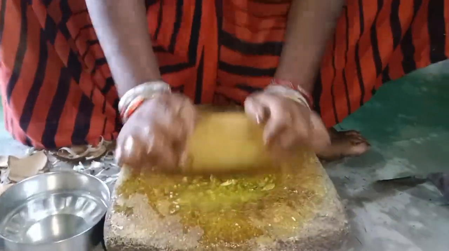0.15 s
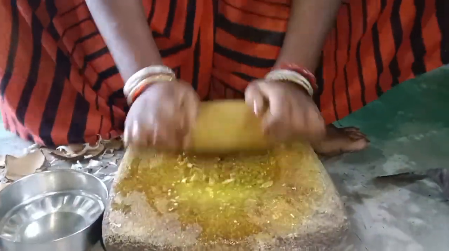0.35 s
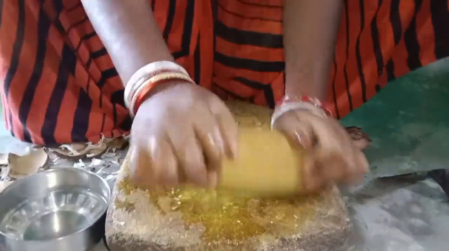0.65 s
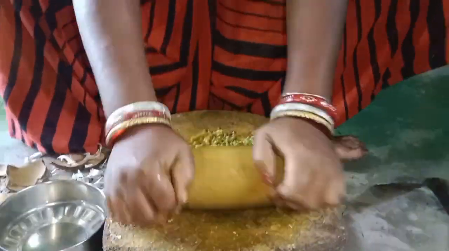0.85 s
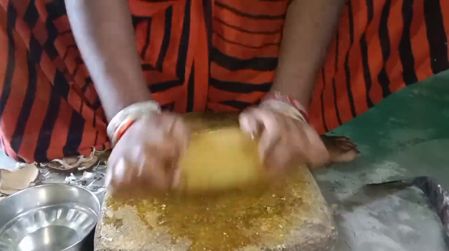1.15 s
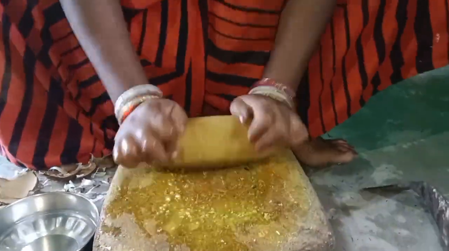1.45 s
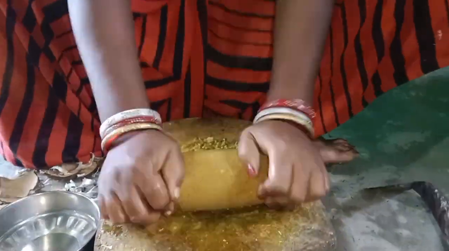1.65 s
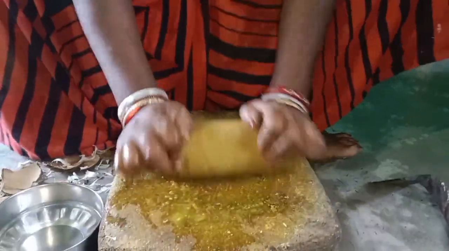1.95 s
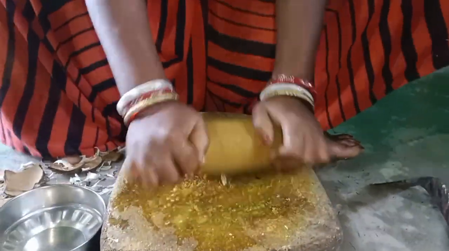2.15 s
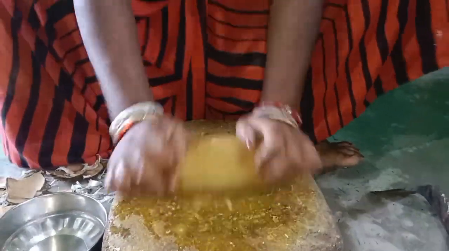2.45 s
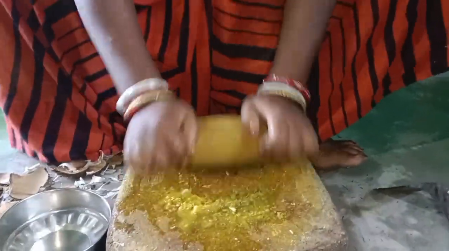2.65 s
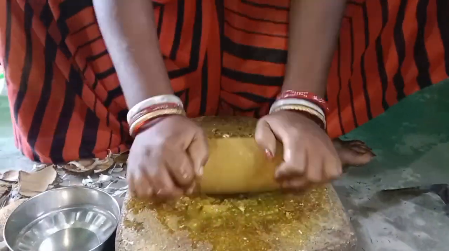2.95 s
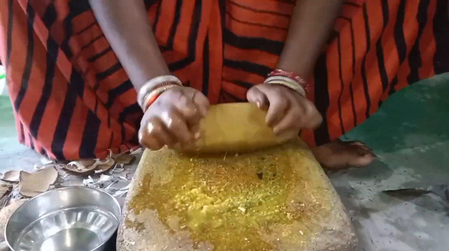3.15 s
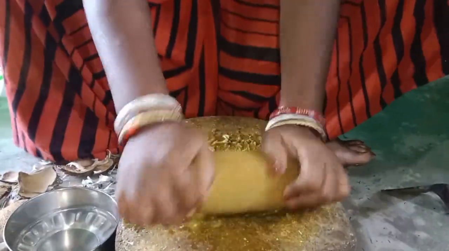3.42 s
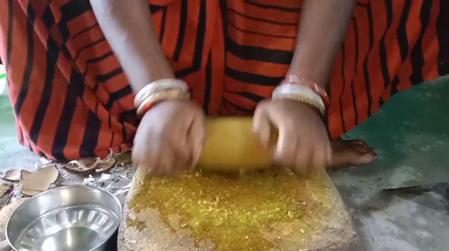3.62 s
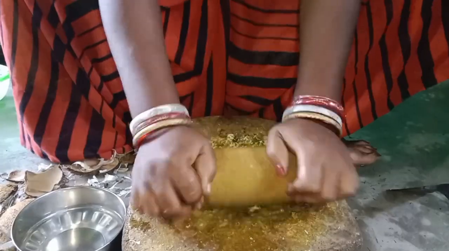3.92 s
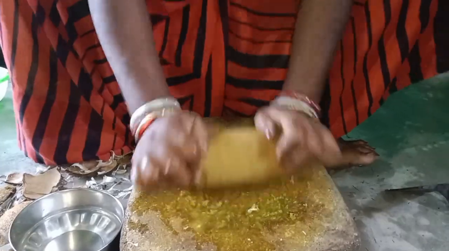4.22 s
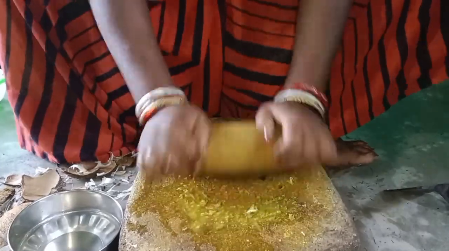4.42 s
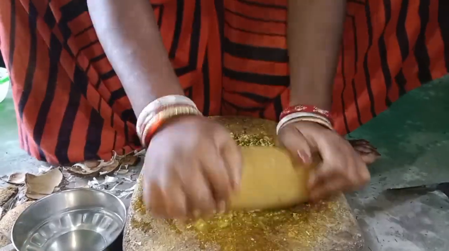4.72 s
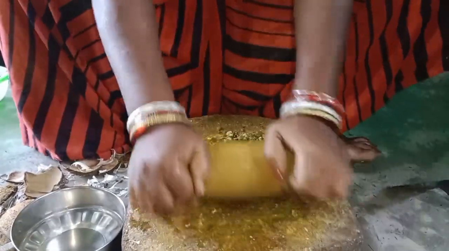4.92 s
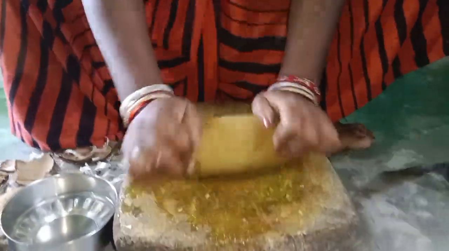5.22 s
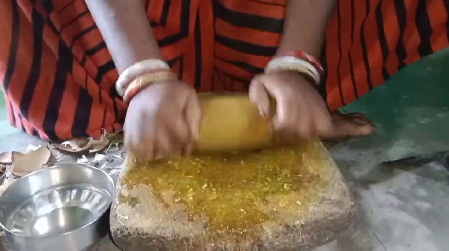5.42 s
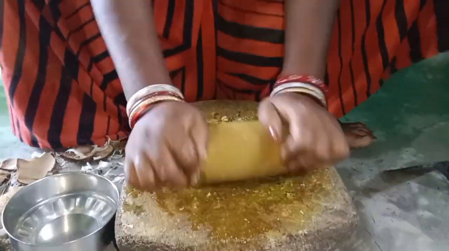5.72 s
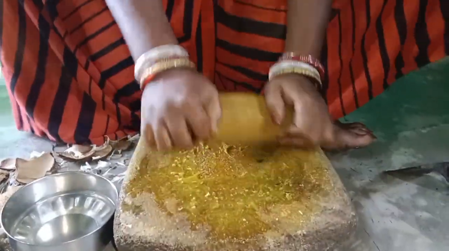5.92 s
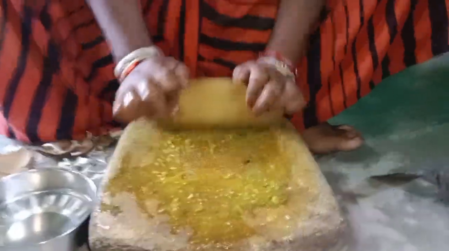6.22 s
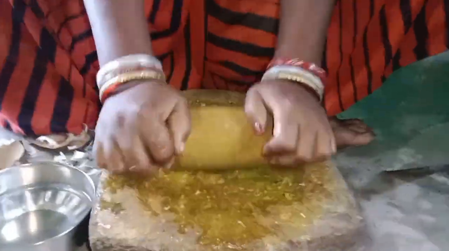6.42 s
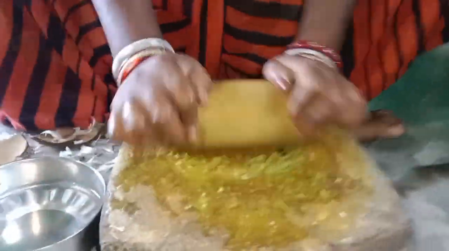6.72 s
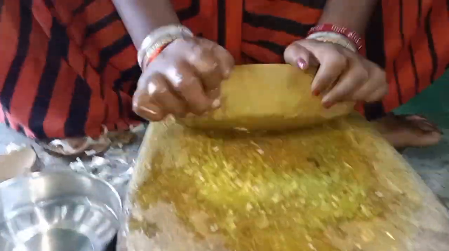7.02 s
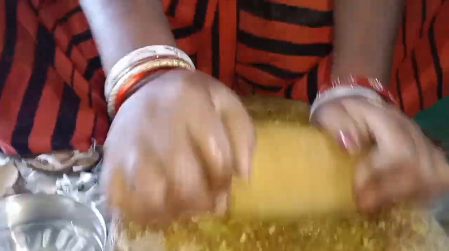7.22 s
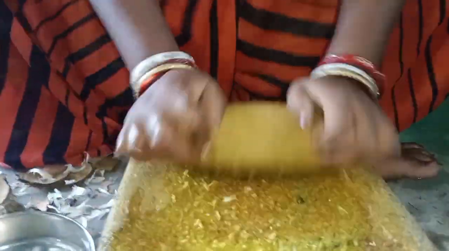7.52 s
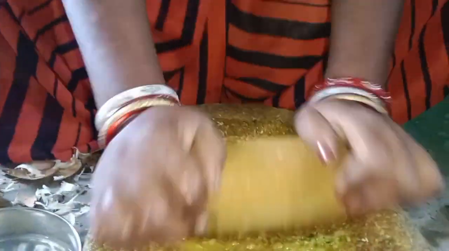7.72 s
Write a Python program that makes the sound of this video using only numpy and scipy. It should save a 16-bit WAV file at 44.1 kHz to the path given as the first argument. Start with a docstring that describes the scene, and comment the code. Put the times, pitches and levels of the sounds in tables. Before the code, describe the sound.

A heavy stone roller is pushed to and fro over a flat stone slab, grinding moist spices. Gritty mid-pitched rasps come about five a second, alternately strong and weak, with short dry knocks when the stones catch. Bangles on the wrists clack brightly at many turns, and paste hisses softly. Close microphone in a small hard room, faint steady background, a slight puff of air midway.

```python
"""Stone roller on a stone slab

A stone roller rasps to and fro over a slab: rough noise rings both stones through their resonances.
Sharp thuds are grit catching; shaped noise makes the treble hiss and the rumbling air.
Bangles clack as short noise bursts ring decaying modes. Small walls answer, air puffs on the microphone,
and a faint steady home lies behind."""
import sys
import numpy as np
from scipy import signal
from scipy.fft import rfft, irfft, next_fast_len
from scipy.io import wavfile
from scipy.ndimage import uniform_filter1d, map_coordinates

SR = 44100
rng = np.random.default_rng(int(sys.argv[2]) if len(sys.argv) > 2 else 0)


def store_wav(level_fs):
    """Save 16-bit WAV to argv[1]."""
    pcm = np.round(np.clip(np.atleast_2d(level_fs), -1, 1) * 32767)
    wavfile.write(sys.argv[1], SR, pcm.T.astype(np.int16))


N = 347067
TIME = np.arange(N) / SR
STEPS = np.arange(0, N / SR, .001)  # control steps of a millisecond

# Strokes of the roller: [bite t/s, swell/s, hold/s, bite level/dB, peak level/dB, mid-stroke centre f/Hz,
# then base levels over the rasp: slab bass/dB, roller low ring/dB, roller high ring/dB]
STROKES = [(0.0, 0.0071, 0.018, -45, -47.5, 729.4, -9, -26, -19),
           (0.113, 0.016, 0.01485, -51, -50, 833.8, -4, -7, -16),
           (0.334, 0.00372, 0.003485, -27, -29, 760, -8.5, -21, -26.5),
           (0.473, 0.037, 0.044, -58, -56.5, 768.9, -6, -42, -40),
           (0.705, 0.12, 0.029, -19, -13, 886, -20, -20, -16.5),
           (0.954, 0.14, 0.0073, -22.5, -15.5, 666, -7, -37.5, -22.5),
           (1.194, 0.023, 0.0627, -49.5, -47.5, 675.2, 3.5, -20.5, -20),
           (1.269, 0.064004, 0.0379, -46.5, -21.5, 766.3, -13.5, -32, -22),
           (1.49, 0.012, 0.0049, -21.5, -20.5, 860, -8.5, -32.5, -23.5),
           (1.729, .004, 0.078, -28, -28.5, 709.9, -10.5, -24.5, -23.5),
           (1.884, 0.039, 0.00302, -48.5, -32.5, 717.3, 0, -20, -20.5),
           (2.116, 0.0072, 0.015, -27, -23.5, 825.1, -19, -20.5, -33),
           (2.193, 0.01226, 0.069, -50, -44, 690.5, 1, -26.5, -28),
           (2.315, 0.094, 0.00341, -27, -16.5, 893, -14.5, -10.5, -26.5),
           (2.598, 0.018, 0.052, -39, -23, 730, -10, -21, -23.5),
           (2.78, 0.01559, 0.01168, -26, -23.5, 840, -10.5, -12, -17.5),
           (2.996, 0.027, 0.0044, -22.5, -19.5, 760, -26.5, -23, -29.5),
           (3.178, 0.04614, 0.073, -50.5, -49, 728.2, -4.5, -10, -12),
           (3.419, 0.068, 0.04842, -23.5, -11.5, 934, -25, -15.5, -22),
           (3.667, 0.00647, 0.16, -26.5, -28.5, 603, -0.5, -30, -29),
           (3.942, 0.076, 0.00369, -30.5, -19, 690, -16.5, -29, -25.5),
           (4.145, 0.016994, 0.03994, -26, -25.5, 800, -7, -15, -21),
           (4.353, 0.025, 0.04839, -23, -17.5, 834, -14.5, -21.5, -27.5),
           (4.55, 0.029, 0.04544, -56, -53, 788, -6.5, -11, -20.5),
           (4.793, 0.052, 0.061, -19.5, -14.5, 906, -18.5, -14.5, -21.5),
           (5.031, 0.091, 0.087, -26.5, -16, 630, -8.5, -35.5, -25),
           (5.308, 0.067, 0.084, -47, -16.5, 820, -17.5, -22, -27.5),
           (5.579, 0.012, 0.054, -27, -24.5, 790, -9.5, -17, -22),
           (5.785, 0.028, 0.06889, -29, -23.5, 787.4, -10, -19, -26.5),
           (5.994, 0.086, 0.062, -25, -20, 785.8, -16.5, -12.5, -16),
           (6.185, 0.06, 0.045, -40, -38.5, 840, -5.5, -13, -19),
           (6.372, 0.082, 0.052, -23.5, -16, 768.9, -13, -21, -25),
           (6.6, 0.065, 0.07799, -49, -35, 835, -11.5, -21.5, -26.5),
           (6.859, 0.00747, 0.096, -20.5, -16.5, 860, -16.5, -25.5, -30.5),
           (7.047, 0.062, 0.038, -50, -26, 834.6, -10, -32, -38),
           (7.287, 0.06011, 0.076, -28, -14.5, 956, -27, -19, -21),
           (7.51, 0.0068, 0.082, -33, -26, 686, -4, -27, -33),
           (7.62, 0.022, 0.11, -47, -43, 764, -8, -18, -37),
           (7.837, 0.038, 0.047, -20.5, -13.5, 910, -31, -26.5, -24)]
# Drift through a stroke of bass, low ring, high ring: [rate/(dB/s), extra rate per octave of brightness/(dB/s)]
STROKE_DRIFT = [(64.5, 101.5), (-10, -500), (68, 248)]
# Slab resonances: [f/Hz, width/Hz, level/dB]
SLAB_MODES = [(541, 84, -4), (652, 48.775, 2), (790.67, 41.7, -3), (847.4, 31.6, -1.5), (934.3, 45, 3),
              (1034, 33, -1.5), (1121.4, 31.4, -6.5), (1196, 66, -4), (1383, 198, -5), (1663, 197, -4),
              (1771, 155, -2.5), (2125, 340, -15.5)]
# Deep slab resonances: [f/Hz, width/Hz, level/dB]
SLAB_BASS_MODES = [(224, 50, -7), (209, 33.7, -7), (324.6, 32.6, -2), (386.6, 32.25, 2.5), (457, 83, -4)]
# Low ring of the roller: [f/Hz, width/Hz, level/dB]
ROLLER_LOW_MODES = [(2553, 28, 10), (2610, 90, -7), (2481.5, 200, -13)]
# Lower roller modes that swell late in the long pushes: [f/Hz, width/Hz, level/dB]
ROLLER_LATE_MODES = [(2345, 50, 0), (2300, 250, -12)]
# Those late swells: [peak t/s, Gaussian half length/s, level/dB]
LATE_SWELLS = [(0.831, 0.06212, -35.5), (1.526, 0.027, -48), (2.434, 0.03032, -36), (3.547, 0.043, -39),
               (4.89, 0.042, -41), (6.198, 0.035, -36.5), (6.45, 0.075, -52), (7.405, 0.03386, -35)]
# High ring of the roller: [f/Hz, width/Hz, level/dB]
ROLLER_HIGH_MODES = [(3830, 55, -7), (4940, 160, -16), (5290, 140, -9.5), (5936, 124, -3.5), (5980, 80, 3),
                     (6164, 175, -7), (8160, 190, -21.5), (11800, 400, -25)]
# Tilt of each high roller mode while a stroke rises, reversed while it falls: [level/dB]
ROLLER_RISING_TILT = [-3, 6, -3.5, -2, -0.5, -3, -0.5, -0.5]
# Hard catches of stone on stone: [t/s, impulse level/dB]
KNOCKS = [(0.3332, -20), (0.8439, -12), (0.8637, -7.5), (0.951, -12.5), (0.9802, -1), (1.0264, -6),
          (1.0651, -6), (1.4982, -7), (1.9383, -23), (2.1485, -18), (2.3335, -14.5), (2.4066, -16),
          (2.42, -16), (3.0263, -14.5), (3.4424, -14.5), (3.4783, -3), (3.6612, -15), (3.7353, -20),
          (4.0054, -10.5), (4.1489, -18), (4.1723, -13), (4.3518, -20), (4.4284, -18), (4.8149, -12.5),
          (5.0361, 0), (5.0492, -9.5), (5.0741, -12.5), (5.0953, -9), (5.119, -7.5), (5.1721, -12),
          (5.4019, -20), (5.4283, -8.5), (5.4508, -10), (5.5905, -15.5), (5.6095, -12.5), (5.821, -18),
          (6.0526, -14), (6.4357, -6), (6.4558, -6.5), (7.0888, -17), (7.1505, -26), (7.5096, -10.5),
          (7.5495, -14)]
# Swells of treble hiss: smeared paste, and the hissing tails of bangle clacks; levels are before the
# hiss trim, times are clipped to 4-300 ms: [peak t/s, level/dB, 20 dB rise/s, 20 dB fall/s]
HISS_SWELLS = [(0.0, -37.5, .02, 0), (.055, -43.5, 0.1, 0.3), (.375, -49, .06, .04), (.424, -34, .008, .07),
               (.55, -48, -0.3, .1), (.75, -37.5, -0.16, -2), (.85, -49, 0.5, -2.1), (.988, -37, -0.3, .15),
               (1.1, -55, 2, 0), (1.32, -31.5, 0.05, .07), (1.42, -43, -1, .15), (1.5, -47.5, 0, 1),
               (1.76, -51.5, -0.5, 2), (1.816, -39, .015, -0.4), (1.96, -53, .08, 0), (2.17, -48.5, 0, 0.5),
               (2.215, -44, 0.2, .07), (2.385, -51, -0.1, 0), (2.63, -32, .025, 0.1),
               (2.7, -33.5, .03, -0.16), (2.8, -39, -0.45, 0.1), (3.05, -56, -2.5, -1.5),
               (3.11, -44.5, 0.1, .1), (3.27, -58, .15, 0.5), (3.5, -41, 0.06, .1), (3.69, -37.5, -0.12, 0),
               (3.9, -47.5, 0, -1), (4.0, -44.5, 0.15, -0.5), (4.06, -34.5, 0.07, 0.1), (4.2, -51, 1, 0.25),
               (4.42, -52.5, -0.2, 0.5), (4.47, -40, 0.07, .07), (4.66, -55, 0.2, .05),
               (4.865, -38, .13, .08), (5.06, -38, .06, .1), (5.47, -47.5, .13, 0),
               (5.62, -50.5, -0.5, .11), (5.885, -46, -0.2, 0.2), (6.004, -44, 0.07, .17),
               (6.25, -61, -4, .1), (6.45, -54, -0.3, 3), (6.545, -35, .06, 0.03), (6.645, -48, 0.1, .1),
               (6.96, -34.5, -0.74, 0.04), (7.11, -49.5, 0, 0), (7.35, -40.5, -0.47, 0.5),
               (7.53, -45, -0.3, .12), (7.7, -57.5, -0.5, 0.8), (7.87, -47, 0.1, .2)]
# Colour of the treble hiss: [f/Hz, relative density/dB]
HISS_COLOUR = [(1650, -10.5), (2800, -1.5), (4390, -2), (5180, -7.5), (7770, 2.5), (10600, 2), (13900, -1),
               (15800, -1)]
# Bangle clacks: [t/s, peak level before the high-pass/dB, brightest f/Hz, lower modes level/dB,
# echo level against the clack/dB]
CLACKS = [(0.0409, -14.5, 12900, -1, -8), (0.2565, -45, 8118, -26, -10), (0.4139, -10.5, 11200, -2.5, -8),
          (0.578, -34, 10390, -20, -18), (0.696, -41, 11000, -10, -8.5), (0.978, -23, 11090, -28, 4),
          (1.302, -27, 11240, -15, -6.5), (1.309, -21, 14360, 3, 5), (1.408, -14.5, 13040, -22, -2.5),
          (1.807, -15.5, 12800, -5, -9), (2.0685, -51, 9000, -12, -8), (2.2072, -29.5, 11300, -5.5, -6.5),
          (2.618, -25, 13400, -3.5, 5), (2.693, -18, 14420, -8, -14), (2.7903, -12.5, 14080, -36, -1.5),
          (3.1033, -20.5, 14170, -18, -8.5), (3.333, -48.5, 9000, -11, -10), (3.487, -24, 8120, 12, -11),
          (3.672, -24.5, 7630, -28, 8.5), (3.695, -15.5, 11930, 12, -6), (3.8211, -45, 13170, 1.5, -2),
          (3.89, -38.5, 8420, -15, -17.5), (4.052, -12.5, 13900, -12.5, -12),
          (4.2428, -28.5, 8334, -22.5, -19), (4.2606, -33.5, 8500, -26, -12),
          (4.462, -22.5, 11540, -20, -13), (4.653, -43, 11030, -1.5, -11), (4.8675, -19, 8396, 1.5, -5.5),
          (5.0085, -43, 9500, -10, -10), (5.037, -28, 7570, -11, -8), (5.0677, -19.5, 8265, -32, -0.5),
          (5.4675, -24.5, 11080, 6, -5), (5.8837, -33, 14300, 0, -13.5), (5.9945, -22, 8400, -17.5, -1),
          (6.2843, -42, 11300, 14, -5), (6.5386, -18.5, 14290, 0.5, -5), (6.6367, -33.5, 8417, -9, 3),
          (6.959, -29, 7630, -14, 1), (7.2035, -51, 9000, -8, -10), (7.3786, -21, 8370, 11, -6),
          (7.526, -28, 7646, -21, 3.5), (7.5493, -32.5, 8170, 22, -10), (7.7425, -43, 9000, -12, -7)]
# Lower bangle modes, before random detuning: [f/Hz, width/Hz, level/dB]
BANGLE_LOW_MODES = [(3667.7, 500, -3.5), (4700, 350, -4.5), (5800, 350, -5)]
# Upper bangle modes, before random detuning: [f/Hz, width/Hz, level/dB]
BANGLE_HIGH_MODES = [(7760, 540, 4), (8470, 330, 7.5), (9399.3, 460, 8.5), (11540, 490, 12),
                     (12100, 560, 8), (13700, 1700, 17)]
# Gusts from the swinging arms, before the air trim; times are clipped to 4-300 ms:
# [peak t/s, level/dB, 20 dB rise/s, 20 dB fall/s]
GUSTS = [(1.03, -53, .1, .2), (1.36, -44, 0.1, -0.1), (3.709, -54, 0, .15), (3.95, -54, 2.5, .1),
         (5.075, -40, .06, .15), (6.24, -35, .06, 0), (7.189, -50, -0.2, 0.3), (7.57, -53, .1, -1),
         (7.747, -50, .1, 0.5), (7.87, -48, .05, .2)]
# Colour of the stirred air: [f/Hz, relative density/dB]
AIR_COLOUR = [(15, -11.5), (40, -6.5), (80, -6), (140, -7.5), (250, -16), (500, -120)]
# Sudden pushes of air: [centre t/s, level at centre/dB, length/s, lean towards the rebound]
PUFFS = [(3.87, -19, 0.0052, .1), (4.028, -34.5, .007, 1.1)]
# Decay of the near walls: [f/Hz, 60 dB decay/s]
WALL_DECAY = [(300, 0.074), (2000, 0.14), (6000, 0.035), (14000, 0.057)]
# Colour of the home at rest: [f/Hz, relative density/dB]
HOME_COLOUR = [(18, -50), (30, 8), (264, -6), (382, 6), (775, -23.5), (2100, -7.5), (2590, -23),
               (2870, -12), (6000, -22), (11800, -40), (15800, -62)]
# Half the left-right difference against the shared sound: [f/Hz, level/dB]
STEREO_SCATTER = [(1500, -72.5), (3000, -43.5), (4500, -16.5), (9000, -13), (15000, -12)]

# Stroke envelope: onset slope at the bite, extra steepness before it, sag in the hold, fall in the lift
BITE_DB_PER_S, STEEPEN_DB_PER_S2, SAG_DB_PER_S, LIFT_DB_PER_S = 750, 12000, 115, 362
ROLLER_REST_DB = -74.5
CLIMB_PER_S, MIDDLE_HZ = .3, 837  # log climb of the centre in a stroke; strokes above the middle are bright
CRUNCH_PER_S, CRUNCH_DB = 70, 3  # small catches; level over the rasp before a random factor of -2 to 2
HISS_REST_DB, HISS_TRIM_DB = -76, -3  # the rest level is before the trim
AIR_REST_DB, AIR_TRIM_DB = -73.5, 1  # the rest level is before the trim
HOME_DB = -71.5
TOP_HZ = 15750


def strokes():
    """Each stroke bites, swells, holds while sagging and lifts; the loudest stroke dominates the colour."""
    bite_s, swell, hold, bite_db, peak_db, hz, *over_db = np.transpose(STROKES)[:, :, None]
    t = STEPS - bite_s
    before = np.minimum(t, 0)
    onset_db = BITE_DB_PER_S * before - STEEPEN_DB_PER_S2 * before ** 2
    swell_db = (peak_db - bite_db) * np.clip(t / swell, 0, 1)
    sag_db = SAG_DB_PER_S * np.clip(t - swell, 0, hold)
    lift_db = LIFT_DB_PER_S * np.maximum(t - swell - hold, 0)
    level_db = bite_db + onset_db + swell_db - sag_db - lift_db

    # Seconds from mid-stroke; the colour goes on drifting for 21 ms into the lift
    through = np.clip(t, 0, swell + hold + 0.021) - (swell + hold) / 2
    bright = np.log2(hz / MIDDLE_HZ)
    colours = [hz * np.exp(CLIMB_PER_S * through)]
    for db, (rate, more) in zip(over_db, STROKE_DRIFT):
        colours.append(db + (rate + more * bright) * through)
    share = amp(level_db) / amp(level_db).sum(axis=0)
    blended = [np.interp(TIME, STEPS, (share * colour).sum(axis=0)) for colour in colours]
    return [total(level_db, ROLLER_REST_DB)] + blended


def grinding(slab_db, centre_hz, bass_db, low_db, high_db):
    """Grit under the roller shakes both stones; slab modes nearest the moving centre are driven hardest."""
    rising = np.tanh(uniform_filter1d(np.gradient(slab_db), size=1800) * SR / 350)
    centre_hz = centre_hz * np.exp(.23 * rising)  # the rasp starts high and sinks as the roller slows
    rasp = grit(spiky_db=3.0, lumpy_db=3.5, rate=82)

    octaves = np.log2(np.array(SLAB_MODES)[:, :1] / centre_hz)
    # Harder strokes reach the upper modes
    bite_db = 0.063 * (np.clip(slab_db, -45, 0) + 31.5) * np.clip(octaves, 0, 1)
    focus_db = 10 + 12 * np.clip(rising, 0, 1)  # dB per octave: a starting stroke is narrow, then spreads
    # The contact finds other nodes as it travels
    shifting_db = np.array([2.78 * wobble(14) for mode in SLAB_MODES])
    slab_weights = amp(bite_db - focus_db * np.abs(octaves) + shifting_db)
    slab = ring(amp(slab_db) * rasp, SLAB_MODES, slab_weights)
    slab = filtered(slab, lambda hz: 1 / (1 + (hz / 2600) ** 6))  # soft contact: little above the modes

    weight_db = np.interp(TIME - .012, TIME, slab_db)  # the arms' weight comes to bear late in the stroke
    # Dull strokes reach deepest
    deep_db = 25 * np.log2(centre_hz / 800) * np.log2(np.array(SLAB_BASS_MODES)[:, :1] / 390)
    bass = ring(amp(weight_db + bass_db - 2.0 * rising) * rasp, SLAB_BASS_MODES, amp(deep_db))
    bass = filtered(bass, lambda hz: 1 / (1 + (hz / 700) ** 4) / (1 + (140 / (hz + 1)) ** 4))

    fine = grit(spiky_db=1.5, lumpy_db=3, rate=30)
    damped_db = .4 * np.clip(slab_db + 32, -30, 0)  # a resting roller is damped by the paste
    low_weights = amp([3.0 * wobble(12) for mode in ROLLER_LOW_MODES])
    low = ring(amp(slab_db + low_db + damped_db) * fine, ROLLER_LOW_MODES, low_weights)
    late = sum(amp(db) * np.exp(-((TIME - s) / half) ** 2 / 2) for s, half, db in LATE_SWELLS)
    low = low + ring(late * fine, ROLLER_LATE_MODES)
    low = filtered(low, lambda hz: 1 / (1 + (np.log2((hz + 1) / 2500) / 1.2) ** 4))

    # Hands damp the roller differently as it turns
    high_weights = amp([3.0 * wobble(14) + tilt_db * rising for tilt_db in ROLLER_RISING_TILT])
    coarse = grit(spiky_db=3.0, lumpy_db=5.0, rate=32)
    high = ring(amp(slab_db + high_db) * coarse, ROLLER_HIGH_MODES, high_weights)
    high = filtered(high, lambda hz: 1 / (1 + (3300 / (hz + 1)) ** 8))
    return slab + bass + low + high


def knocks(slab_db):
    """A catch is a thud of under two cycles: the pressed stones damp it at once, the slab hums on faintly."""
    t = (np.arange(SR // 100) - SR // 200) / SR
    thud = -np.sin(2 * np.pi * 760 * t) * np.exp(-(t / .00078) ** 2 / 2)
    luck = rng.random((2, N))
    caught = luck[0] < CRUNCH_PER_S / SR
    crunch = caught * (2 * luck[1] - 1) * 2 * amp(slab_db + CRUNCH_DB)
    hard = blows(KNOCKS, np.array(KNOCKS)[:, 1])
    hits = signal.fftconvolve(hard + crunch, thud, mode="same")
    return hits + amp(-19.0) * ring(hits, SLAB_MODES)


def treble_hiss():
    """Smeared paste and the tails of bangle clacks hiss, in patches that wander over the treble."""
    hiss_db = bursts(HISS_SWELLS, HISS_REST_DB)
    crackle = grit(spiky_db=1.5, lumpy_db=2, rate=45)
    z = signal.stft(crackle, nperseg=256)[2]
    patches = uniform_filter1d(rng.standard_normal(z.shape), size=6, axis=0)
    patches = uniform_filter1d(patches, size=14, axis=1)
    crackle = signal.istft(z * amp(5.1 * unit(patches)), nperseg=256)[1][:N]
    hiss = unit(filtered(crackle, lambda hz: amp(along(HISS_COLOUR, hz))))
    return amp(hiss_db + HISS_TRIM_DB) * hiss


def bangles():
    """Bangles clack: a short noise burst with a soft onset rings freshly detuned modes; an echo follows."""
    out, t = np.zeros(N + SR), np.arange(SR // 4) / SR
    low, high = np.array(BANGLE_LOW_MODES), np.array(BANGLE_HIGH_MODES)
    short, lead = t[:SR // 40], .005  # each burst starts 5 ms ahead of its table time
    since = short - lead - .0014
    envelope = np.where(since < 0, amp(4000 * since - 9), amp(-4500 * since))
    for s, db, bright_hz, low_db, echo_db in CLACKS:
        high_db = -8 * np.abs(np.log2(high[:, :1] / bright_hz))
        modes = np.vstack([low + [0, 0, low_db], high + high_db * [0, 0, 1]])
        hz, width, level_db = modes.T[:, :, None]
        luck = rng.standard_normal((2, len(hz), 1))
        hz, level_db = hz * (1 + .04 * luck[1]), level_db + 3 * luck[0]
        partials = amp(level_db) * np.exp(-np.pi * width * short) * np.sin(2 * np.pi * hz * short)
        body = partials.sum(axis=0)

        burst = envelope * rng.standard_normal(len(short))
        clack = signal.fftconvolve(burst, body)[:len(short)]
        clack = clack + 4 * np.diff(burst, prepend=0)  # the burst itself, brightened
        clack = clack * amp(db) / np.abs(clack).max()

        tail = rng.standard_normal(len(t)) * amp(-60 * (t / 0.13) ** 1.1) * (1 - np.exp(-t / 0.0057))
        blurred = body * np.exp(-short / .0004)  # the walls smear the modes into bands
        tail = np.pad(signal.fftconvolve(tail, blurred), (SR // 160, 0))[:len(t)]
        sound = amp(echo_db) * np.linalg.norm(clack) * tail / np.linalg.norm(tail)
        sound[:len(clack)] += clack
        out[round((s - lead) * SR):][:len(t)] += sound
    return filtered(out[:N], lambda hz: 1 / (1 + (2900 / (hz + 1)) ** 8))


def air(slab_db):
    """Swinging arms stir the air: lumpy rumble and single pushes; the strokes shake the floor a little."""
    gust = amp(bursts(GUSTS, AIR_REST_DB) + AIR_TRIM_DB)
    floor = amp(1.1 * slab_db - 63.0)
    rumble = filtered(rng.standard_normal(N), lambda hz: amp(along(AIR_COLOUR, hz)))
    out = np.hypot(gust, floor) * unit(rumble * amp(4.7 * wobble(14)))
    for s, db, length, lean in PUFFS:
        u = (TIME - s) / (length / 2)
        out = out + amp(db) * (1 - u * u - lean * u) * np.exp(-u * u / 2)
    return out


def echo(x):
    """The near walls answer with a noise tail; each frequency dies at its own speed."""
    hz, t, z = signal.stft(rng.standard_normal(SR // 3), SR, nperseg=128)
    decay = amp(-60 * t / along(WALL_DECAY, hz)[:, None])
    tail = signal.istft(z * decay, SR, nperseg=128)[1]
    delayed = np.pad(x, (130, 0))  # about 3 ms
    return signal.fftconvolve(delayed, tail / np.linalg.norm(tail))[:N]


def home():
    """The faint steady background: noise of one fixed colour."""
    return amp(HOME_DB) * unit(filtered(rng.standard_normal(N), lambda hz: amp(along(HOME_COLOUR, hz))))


def amp(db):
    """Gain of a level in dB."""
    return np.exp(np.asarray(db) * (np.log(10) / 20))


def unit(x):
    """x at rms 1."""
    return x / np.sqrt(np.mean(x ** 2) + 1e-20)


def along(points, hz):
    """(Hz, value) points read on a log frequency axis."""
    f, v = np.transpose(points)
    return np.interp(np.log(hz + 1), np.log(f + 1), v)


def wobble(rate):
    """A smooth random curve, rate knots a second."""
    knots = rng.standard_normal(int(N / SR * 400) + 4)
    return np.interp(TIME, STEPS, map_coordinates(knots, [STEPS * rate], order=2))


def filtered(x, response):
    """x times a response of frequency."""
    m = next_fast_len(N + SR // 2)
    return irfft(rfft(x, m) * response(np.fft.rfftfreq(m, 1 / SR)), m)[..., :N]


def ring(x, modes, weights=None):
    """x through a body's weighted resonances, scaled so that white noise of rms 1 stays near rms 1."""
    weights = np.ones((len(modes), 1)) if weights is None else weights
    out, power = 0, 0
    for (hz, width, db), weight in zip(modes, weights):
        power = power + (amp(db) * weight) ** 2 * np.pi * width / SR
    for k, ((hz, width, db), weight) in enumerate(zip(modes, weights)):
        b, a = signal.iirpeak(hz, hz / width, SR)
        drive = x * amp(db) * weight / np.sqrt(power)
        out = out + (-1) ** k * signal.lfilter(b, a, drive)  # neighbours ring in opposite sign
    return out


def grit(spiky_db, lumpy_db, rate):
    """Tiny impacts of very unequal size that come in lumps, rms 1."""
    grain = np.minimum(rng.exponential(size=N), 8.5)  # grains have a largest size
    size_db = spiky_db * grain + lumpy_db * np.tanh(wobble(rate))
    return unit(amp(size_db) * rng.standard_normal(N))


def blows(rows, db):
    """One impulse at the time of each row."""
    at = np.round(np.array(rows)[:, 0] * SR).astype(int)
    return np.bincount(at, amp(db), N)


def total(levels_db, rest_db):
    """Overlapping events add their power over a resting level; dB per sample."""
    power = np.sum(amp(2 * levels_db), axis=0) + amp(2 * rest_db)
    return np.interp(TIME, STEPS, 10 * np.log10(power))


def bursts(rows, rest_db):
    """Level of events that rise to a peak and fall away, straight in dB."""
    s, db, rise, fall = np.transpose(rows)[:, :, None]
    before = (s - STEPS) / np.clip(rise, .004, .3)
    after = (STEPS - s) / np.clip(fall, .004, .3)
    return total(db - 20 * np.maximum(before, after), rest_db)


def scene():
    """Two close ports hear the same sound; only the scattered treble differs between them."""
    pressure = strokes()
    slab_db = pressure[0]
    stones = grinding(*pressure) + knocks(slab_db)
    mid = stones + amp(-10) * echo(stones) + treble_hiss() + bangles() + air(slab_db) + home()
    hz, _, z = signal.stft(mid, SR, nperseg=256)
    random_phase = np.exp(2j * np.pi * rng.random(z.shape))
    scatter = random_phase * amp(along(STEREO_SCATTER, hz))[:, None]
    side = signal.istft(z * scatter, SR, nperseg=256)[1][:N]
    return np.array([mid + side, mid - side])


def record(dry):
    """A very steep low-pass leaves almost nothing above the band limit."""
    return filtered(dry, lambda hz: 1 / (1 + (hz / TOP_HZ) ** 120))


dry = scene()
out = record(dry)
store_wav(out)
```